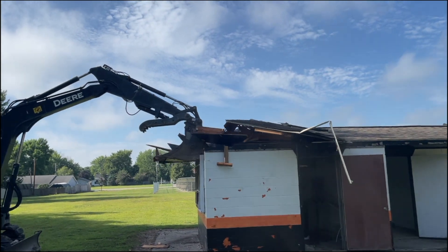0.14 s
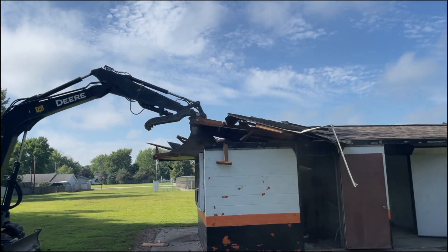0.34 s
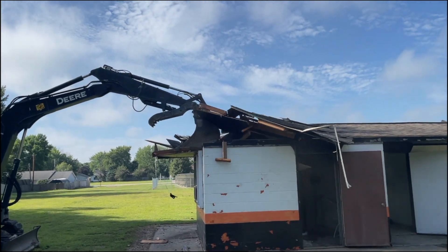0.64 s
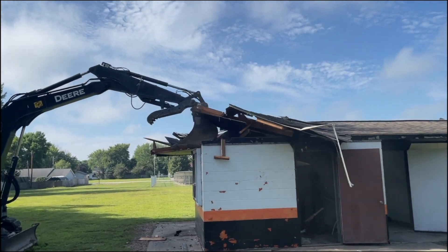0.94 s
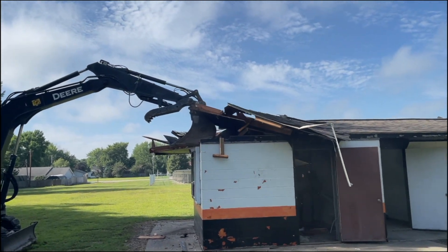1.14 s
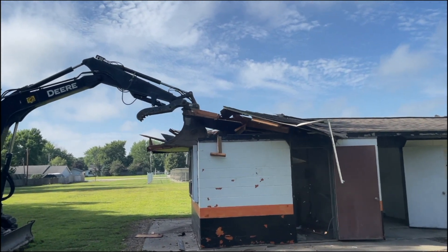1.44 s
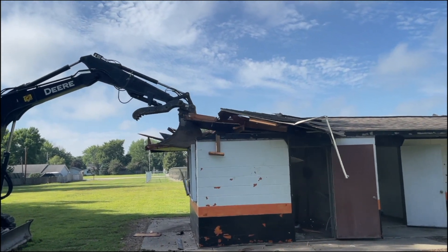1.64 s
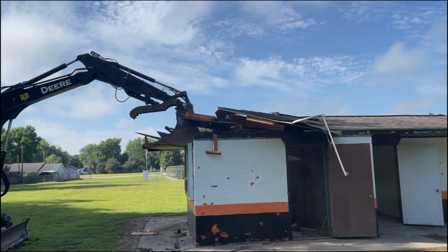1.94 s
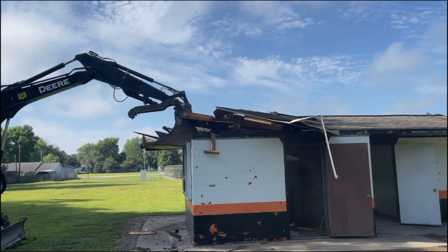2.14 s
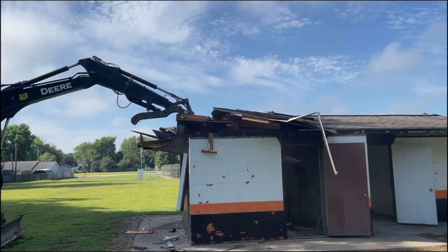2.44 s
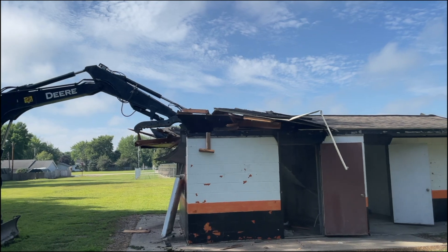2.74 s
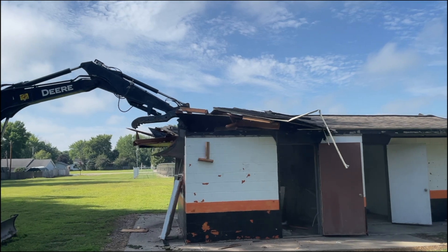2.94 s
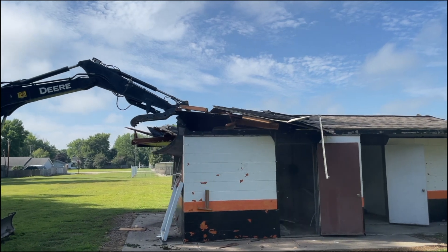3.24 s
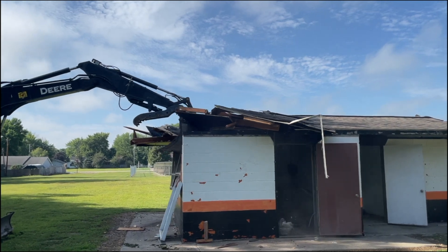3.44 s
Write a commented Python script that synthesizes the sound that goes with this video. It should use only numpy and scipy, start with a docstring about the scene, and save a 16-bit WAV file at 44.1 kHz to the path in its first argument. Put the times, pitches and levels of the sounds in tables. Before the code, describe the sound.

Wood boards crack and splinter over a droning diesel engine; the breakage thins midway, then builds into dense loud snaps, thuds and booming frame shifts. Open yard, slight short echo, handheld stereo microphone at a distance.

```python
"""Excavator pulling down a timber roof

A diesel excavator, some way off in the open, drones and clatters as it pulls a timber roof apart.
Boards splinter in dense crackle and knocking chips, single boards crack and echo, a nail squeals,
and the roof frame rumbles as it shifts. Noise, damped tones and sine partials make the sounds.
The two microphone ports hear it with a phase lag that grows with pitch, amid changing scattered sound."""
import sys
import numpy as np
from scipy import signal
from scipy.fft import rfft, irfft, next_fast_len
from scipy.io import wavfile
from scipy.ndimage import map_coordinates

SR = 44100
rng = np.random.default_rng(int(sys.argv[2]) if len(sys.argv) > 2 else 0)


def transcribe(u):
    """Save the signal u as a 16-bit wav file named by the first command-line argument.

    u: samples, shape (n,) or (channels, n), limited to [-1, 1]; the rate is SR.
    q: integer samples, one column per channel.
    """
    v = np.clip(np.atleast_2d(u).T, -1, 1)
    q = np.round(v * 32767).astype(np.int16)
    wavfile.write(sys.argv[1], SR, q)


N = 158760  # samples, 3.6 s

# Treble colour of breaking wood. Each row: frequency in Hz, relative level per Hz in dB.
GRIT_COLOUR = [(1500, -16.5), (2600, -0.5), (4500, -4.5), (7000, -8.5), (10000, -13), (15000, -27.5)]


def amp(db):
    """Decibels to a linear amplitude factor."""
    return 10 ** (np.asarray(db) / 20)


def unit(x):
    """Scale to an rms of one."""
    return x / np.sqrt(np.mean(x ** 2) + 1e-20)


def along(points, hz):
    """Read (Hz, value) points on a logarithmic frequency axis."""
    f, value = np.transpose(points)
    return np.interp(np.log(hz + 1), np.log(f + 1), value)


def curves(rows):
    """One value per sample for each column after the time in seconds."""
    s, *columns = np.transpose(rows)
    return [np.interp(np.arange(N) / SR, s, column) for column in columns]


def wobble(rate):
    """A smooth random curve with rate knots a second."""
    knots = rng.standard_normal(int(N * rate / SR) + 4)
    return map_coordinates(knots, [np.arange(N) * rate / SR])


def filtered(x, response):
    """Multiply the spectrum of x by a complex response of frequency."""
    m = next_fast_len(x.shape[-1] + 8192)
    return irfft(rfft(x, m) * response(np.fft.rfftfreq(m, 1 / SR)), m)[..., :x.shape[-1]]


def coloured(x, spectrum):
    """Pass x through a causal filter with the given spectrum; white noise keeps its rms."""
    def response(hz):
        # folding the cepstrum gives the minimum-phase filter
        cepstrum = irfft(np.log(amp(along(spectrum, hz))))
        half = len(cepstrum) // 2
        cepstrum[1:half] *= 2
        cepstrum[half + 1:] = 0
        h = np.exp(rfft(cepstrum))
        return h / np.sqrt(np.mean(abs(h) ** 2))
    return filtered(x, response)


def engine():
    """Wavering tones tied to the firing rate, over a noise roar that pulses with the firings."""
    # Each row: time in seconds, second firing harmonic in Hz, its rms level in dB.
    running = [(0.0, 113.3, -31.5), (0.24, 117.8, -24), (0.78, 116.6, -25.5), (0.96, 113.2, -22.5),
               (1.5, 116.2, -23), (1.85, 116.7, -27), (2.3, 113.8, -22), (2.75, 116.9, -24.5),
               (2.81, 115.5, -35), (2.93, 107.4, -28.5), (3.06, 106.3, -19), (3.36, 111.6, -29),
               (3.51, 104.3, -29.5), (3.6, 109.1, -41)]
    # Each row: multiple of that harmonic, level in dB over the level that tone follows.
    partials = [(.5, -7), (1, 0), (2.2, -12), (2.5, -8.5), (5, -17.5)]
    # Each row: frequency in Hz, relative level of the roar per Hz in dB.
    roar_colour = [(30, -36.5), (60, 4), (130, 11), (300, -3.5), (400, -22.5), (600, 5), (850, -19),
                   (1700, -24), (2300, -13), (3500, -42.5), (6500, -28), (10000, -28.5), (15000, -64)]
    waver_db, drift = 2.3, .008  # random level waver; random pitch drift as a fraction
    upper_db = -26.5  # multiples from 2 up waver about this level, whatever the engine's level
    roar_db, firing_depth = -31, .15

    hz, level_db = curves(running)
    phase = 2 * np.pi * np.cumsum(hz * (1 + drift * wobble(8.3))) / SR
    tones = 0
    for multiple, db in partials:
        base_db = level_db if multiple < 2 else upper_db
        level = amp(db + waver_db * wobble(14) + base_db)
        tones = tones + level * np.sin(multiple * phase + 2 * np.pi * rng.random())
    firing = 1 + firing_depth * np.cos(phase / 2)
    roar = unit(coloured(firing * rng.standard_normal(N), roar_colour))
    return np.sqrt(2) * tones + amp(roar_db + .2 * wobble(4.66)) * roar


def crackle(per_s, spread_db, life_s, bed):
    """Tiny fractures of random size, each a dying puff of noise, on a bed of even noise."""
    exceed = np.minimum(rng.exponential(size=N), 2)
    size = (rng.random(N) < per_s / SR) * amp(spread_db * exceed)
    puffs = signal.lfilter([1], [1, -np.exp(-1 / (life_s * SR))], size)
    return (unit(puffs) + bed) * rng.standard_normal(N)


def chips(centre_hz):
    """Small pieces knocking: short damped tones of random pitch and size."""
    spread, decay_cycles = .4, 9  # log-pitch spread; cycles for a tone to fall to 1/e
    when, pitch, size = rng.random((3, 500))
    hz = centre_hz * np.exp(spread * (4 * pitch - 2))[:, None]
    n = np.arange(900)
    decay = np.exp(-n * hz / SR / decay_cycles)
    level = amp(5 * size[:, None]) * (centre_hz / hz) ** .5  # higher chips are weaker
    tones = level * np.sin(2 * np.pi * hz * n / SR) * decay
    places = (when * N).astype(int)[:, None] + n
    return unit(np.bincount(places.ravel(), tones.ravel(), N)[:N])


def tearing():
    """Splintering wood and grit from fractures and chips, with the shifting frame's rumble and boom."""
    # The roof giving way. Each row: time in seconds, splintering level in dB, its treble in dB.
    giving_way = [(0, -20.5, -27.5), (.06, -32, -37.5), (.2, -28.5, -35.5), (.35, -22.5, -30.5),
                  (.45, -28.5, -32), (.62, -30, -36), (.77, -29.5, -40), (.86, -28.5, -37.5),
                  (.92, -20.5, -47), (.99, -33, -43), (1.07, -38.5, -43), (1.13, -42, -41),
                  (1.2, -37.5, -38), (1.56, -30.5, -41), (1.72, -37.5, -46.5), (1.9, -48, -51),
                  (2.02, -48.5, -45.5), (2.28, -33, -37.5), (2.37, -29.5, -36), (2.47, -24, -31),
                  (2.55, -25.5, -23), (2.6, -25, -27), (2.62, -18.5, -21), (2.71, -15.5, -25.5),
                  (2.73, -28.5, -29.5), (2.83, -29.5, -34.5), (2.98, -31, -34.5), (3.07, -23, -32),
                  (3.12, -21, -26), (3.24, -16, -22.5), (3.31, -22, -30.5), (3.4, -22.5, -25.5),
                  (3.43, -37, -65), (3.49, -29.5, -39), (3.6, -26, -34.5)]
    # The roof frame shifting. Each row: time in seconds, rumble level in dB, boom level in dB.
    shifting = [(0.0, -26.5, -34), (0.21, -30, -28), (0.35, -23.5, -17.5), (0.63, -28, -34),
                (0.75, -23.5, -26.5), (1.1, -30.5, -29.5), (1.28, -32, -28), (2.27, -29.5, -41),
                (2.34, -20, -21), (2.43, -27.5, -30.5), (2.7, -18.5, -15), (2.8, -29.5, -27),
                (3.26, -11.5, -17.5), (3.4, -19, -17), (3.43, -43, -37), (3.47, -16, -38),
                (3.52, -29.5, -60), (3.6, -25.5, -28)]
    # Colours of splintering, rumble and boom. Each row: frequency in Hz, relative level per Hz in dB.
    splinter_colour = [(300, -13.5), (600, 4), (1200, 0), (2400, -10.5), (3500, -47.5)]
    frame_colour = [(70, -1.5), (140, 10), (300, 1.5), (550, -5.5), (900, -43)]
    boom_colour = [(25, -26), (45, 19.5), (60, 30), (90, 24), (130, -33)]
    chips_db = -1  # against the fractures
    chip_hz, sliver_hz = 1000, 3223  # centre pitch of the chips and of the smallest pieces

    splinter_db, grit_db = curves(giving_way)
    frame_db, boom_db = curves(shifting)
    fractures = crackle(240, spread_db=3, life_s=.003, bed=.9)
    fine = .6 * fractures + crackle(530, spread_db=4, life_s=.002, bed=.6)
    splinter = unit(coloured(fractures, splinter_colour)) + amp(chips_db) * chips(chip_hz)
    grit = unit(coloured(fine, GRIT_COLOUR)) + amp(chips_db) * chips(sliver_hz)
    rumble = coloured(crackle(140, spread_db=4.5, life_s=.01, bed=.6), frame_colour)
    boom = coloured(rng.standard_normal(N), boom_colour)
    return (amp(splinter_db) * unit(splinter) + amp(grit_db) * unit(grit)
            + amp(frame_db) * unit(rumble) + amp(boom_db) * unit(boom))


def cracks():
    """Boards crack: each a noisy snap, a short blurred two-mode ring, a spray of treble and a thud."""
    # Each row: start in seconds, level in dB, lower ring mode in Hz, treble in dB and thud in dB
    # (both against the level), time in seconds for the snap to fall 60 dB.
    boards = [(0.075, -21, 1230, -3, -23, 0.036), (0.144, -20.5, 3950, -6, 1, 0.038),
              (0.166, -17, 1323, -28, -7, 0.13), (0.309, -18, 1257, -24, -32, 0.53),
              (.386, -22, 4130, -14, -22, 0.014), (0.449, -20, 4440, -14, -15, 0.17),
              (0.691, -22, 2015, -7, -19, 0.041), (0.756, -12.5, 334, -16, -6.5, 0.11),
              (.869, -20.5, 790, -26, -28, 0.092), (0.89, -20.5, 1098, -34, -4.5, 0.36),
              (1.076, -29.5, 2460, 8, -16, 0.017), (1.094, -7.5, 2484, -3, -38, 0.05),
              (1.1, -28, 3840, 15.5, -26, 0.015), (1.109, -20.5, 2630, 9.5, -23, 0.028),
              (1.116, -17, 1760, -32, -21, 0.39), (1.392, -23.5, 3890, -24, -13, 0.059),
              (1.413, -19.5, 1980, -19, 6.5, 0.046), (1.499, -37.5, 5050, 13, -20, 0.014),
              (1.525, -18.5, 806, -38, -31, 0.29), (1.735, -29.5, 4440, -9, -26, 0.047),
              (1.913, -13, 719, -40, -28, 0.091), (1.938, -15, 1172, -18, -5.5, 0.15),
              (1.959, -11, 685, -22, -21, 0.05), (1.995, -22.5, 1210, -19, -20, 0.21),
              (2.294, -15, 1409, -34, -22, 0.18), (2.321, -5.5, 666, -21, -5.5, 0.11),
              (2.494, -13.5, 599.7, -33, -8, 0.12), (2.509, -6.5, 1470, 3.5, -30, 0.058),
              (2.606, -8.5, 659, -7, -24, 0.2), (2.624, -8, 1333, -12, -5, 0.2),
              (2.695, -9.5, 939, -28, -6, 0.1), (2.717, -5, 2380, -36, -17, 0.02),
              (2.898, -12.5, 318, -37, -1, 0.059), (2.94, -17, 1173, -32.5, -33, 0.049),
              (3.005, -2, 596.5, -16, -7, 0.095), (3.096, -28.5, 2275, 9, 1, 0.29),
              (3.129, -7, 341, -25, -9, 0.048), (3.165, -13.5, 252.6, -25, -3, 0.096),
              (3.227, -11.5, 1930, -19, 0, 0.039), (3.243, -6, 417, -25, -1, 0.027),
              (3.409, -3.5, 1622, -5.5, -20, 0.039)]
    # Colours of snap and thud. Each row: frequency in Hz, relative level per Hz in dB.
    board_colour = [(300, -3.5), (700, 3), (1500, -2), (3000, -15.5), (4500, -46)]
    thud_colour = [(80, -16), (200, 0.5), (450, 5.5), (900, -37.5)]
    snap_db, ring_db = -5, -2
    rise_s, hold_s = .0013, .004  # onset time constant; a crack keeps tearing briefly
    ring_blur, blur_t60 = 1.1, .09  # random phase drift; the fall time in s at which it applies as is
    ring_longer, second_mode = .6, 1.42  # ring's fall time over the snap's; upper mode over lower

    out, t = np.zeros(N + SR), np.arange(SR // 4) / SR
    for s, db, hz, treble_db, thud_db, t60 in boards:
        def fade(longer):
            fall = amp(-60 * np.maximum(t - hold_s, 0) / (abs(t60) * longer))
            return fall * (1 - np.exp(-t / rise_s))

        snap, spray, thud, jitter = rng.standard_normal((4, len(t)))
        # a longer or higher crack rings more blurred
        blur = ring_blur * np.sqrt(hz / SR * abs(t60) / blur_t60)
        phase = 2 * np.pi * hz * t + blur * np.cumsum(jitter)
        ring = np.sin(phase) + .5 * np.sin(second_mode * phase)
        layers = [(snap_db, coloured(snap * fade(1), board_colour)),
                  (ring_db, ring * fade(ring_longer)),
                  (treble_db, coloured(spray * fade(.78), GRIT_COLOUR)),
                  (thud_db, coloured(thud * fade(.75), thud_colour))]
        crack = sum(amp(db + rel_db) * x / abs(x).max() for rel_db, x in layers)
        out[round(s * SR):][:len(t)] += crack
    return out[:N]


def echo(x):
    """Walls and ground answer with a noise tail in which each frequency dies at its own speed."""
    # Each row: frequency in Hz, time in seconds to fall 60 dB.
    yard = [(200, 0.8), (2000, 0.19), (10000, 0.022)]
    delay_s = .012
    hz, t, bins = signal.stft(rng.standard_normal(SR // 2), SR, nperseg=256)
    decay = amp(-60 * t / along(yard, hz)[:, None])
    tail = signal.istft(bins * decay, SR, nperseg=256)[1]
    delayed = np.pad(x, (round(delay_s * SR), 0))
    return signal.fftconvolve(delayed, tail / np.linalg.norm(tail))[:N]


def creak():
    """A nail pulling out: a rough squeal and its octave, rising as the nail slides."""
    # Each row: time in seconds, pitch in Hz, level in dB.
    nail = [(2.4, 1907, -39), (2.44, 2175, -28), (2.5, 2320, -42)]
    hz, level_db = curves(nail)
    phase = 2 * np.pi * np.cumsum(hz * (1 + wobble(500) / 25)) / SR  # fast pitch jitter roughens it
    t = np.arange(N) / SR
    sliding = (t > nail[0][0]) * (t < nail[-1][0])
    squeal = np.sin(phase) + .3 * np.sin(2 * phase)
    return sliding * amp(level_db + 4 * wobble(80)) * squeal


def scene():
    """Direct sound at both ports, with scattered paths that differ between them and keep changing."""
    # Share of scattered sound. Each row: frequency in Hz, level in dB.
    diffuse = [(60, -22), (300, -17), (1200, -10), (3000, -7), (5000, -5), (8000, -22), (9500, -13),
               (14000, -16)]
    echo_db = -16
    paths_per_s, path_t60 = 4, .15  # changes of path a second; seconds for a path to fall 60 dB

    snaps = cracks()
    sound = engine() + tearing() + creak() + snaps + amp(echo_db) * echo(snaps)
    t = np.arange(SR // 10) / SR
    turns = np.arange(N) / SR * paths_per_s
    scattered = 0
    for k in range(16):
        path = rng.standard_normal(len(t)) * amp(-60 * t / path_t60)
        share = np.cos(np.clip(turns - k, -1, 1) * np.pi / 2)  # equal-power crossfade between paths
        scattered = scattered + signal.fftconvolve(sound * share, path / np.linalg.norm(path))[:N]
    scattered = filtered(scattered, lambda hz: amp(along(diffuse, hz)))
    return np.array([sound + scattered, sound - scattered])  # opposite sign at the two ports


def record(dry):
    """Port phase and balance, a low cut, a soft ceiling and the band limit."""
    # Each row: frequency in Hz, phase in radians by which left leads (negative: lags).
    left_lead = [(0, 0), (5200, 0), (6000, -.6), (7000, -1.6), (7700, -3), (8700, -3.25), (10700, -6.1),
                 (12500, -6.4), (13800, -9.3), (16500, -9.5)]
    # Each row: frequency in Hz, level of left over right in dB.
    left_louder = [(60, -1.5), (200, -2), (500, -1.6), (1800, -1.6), (2800, .5), (5000, 2), (9000, 0)]
    low_cut_hz, top_hz, ceiling = 44.6, 16300, .98  # ceiling against full scale

    side = np.array([[.5], [-.5]])  # half of each difference goes to either port
    lead_hz, lead = np.transpose(left_lead)

    def ports(hz):
        balance = amp(side * along(left_louder, hz))
        turn = np.exp(1j * side * np.interp(hz, lead_hz, lead))
        low_cut = (1j * hz / (low_cut_hz + 1j * hz)) ** 2
        return balance * turn * low_cut

    x = filtered(dry, ports)
    x = x / (1 + abs(x / ceiling) ** 6) ** (1 / 6)
    return filtered(x, lambda hz: hz < top_hz)


dry = scene()
out = record(dry)
transcribe(out)
```